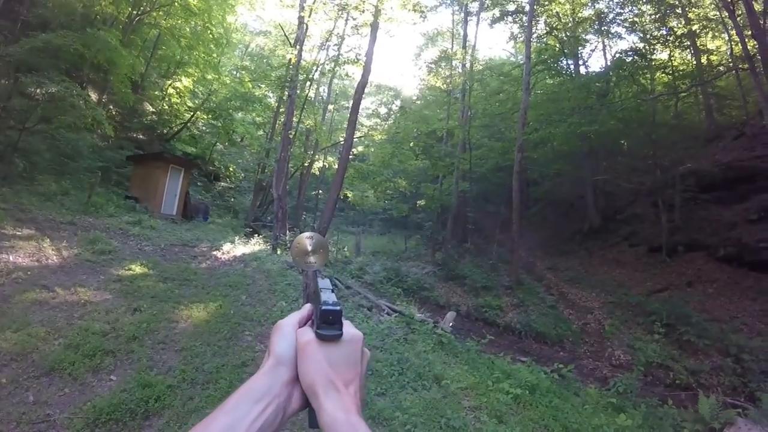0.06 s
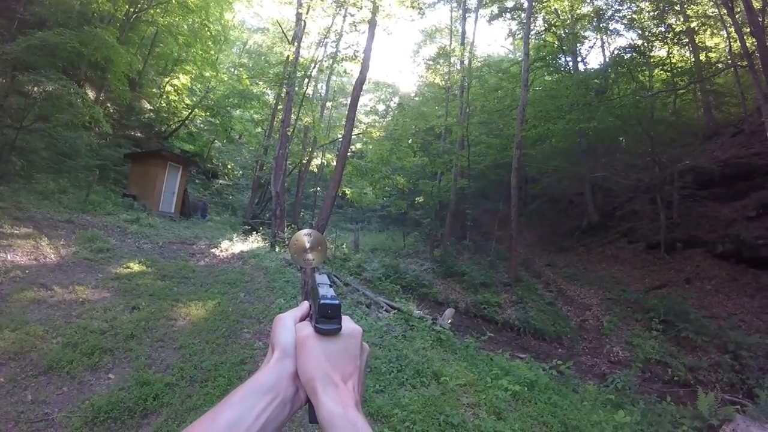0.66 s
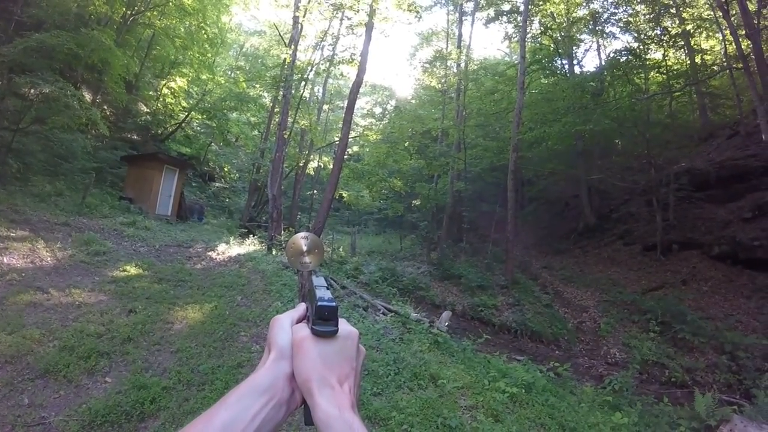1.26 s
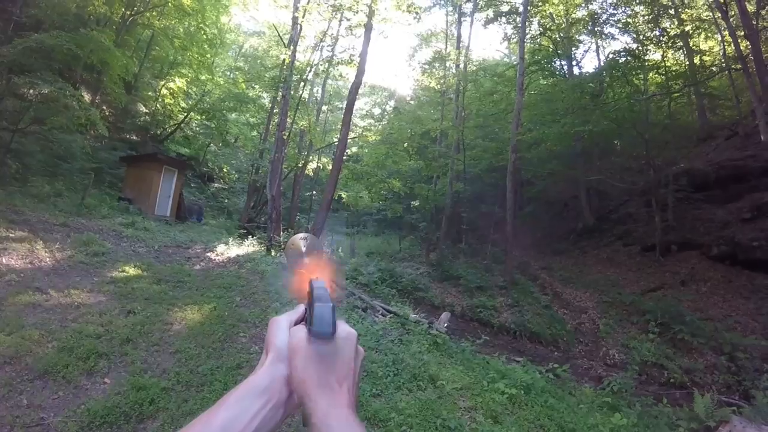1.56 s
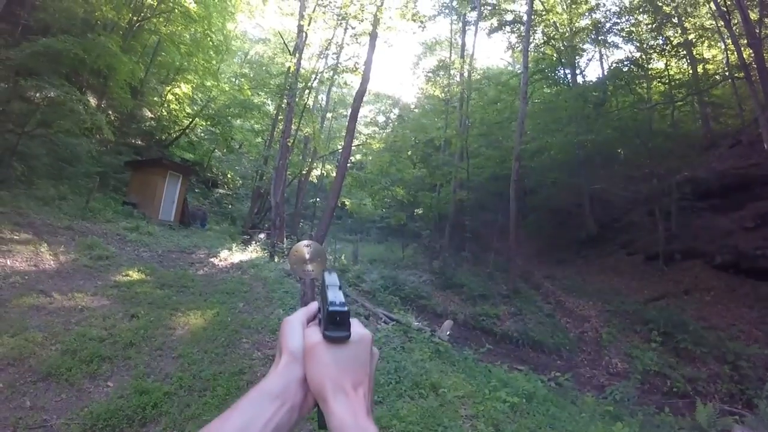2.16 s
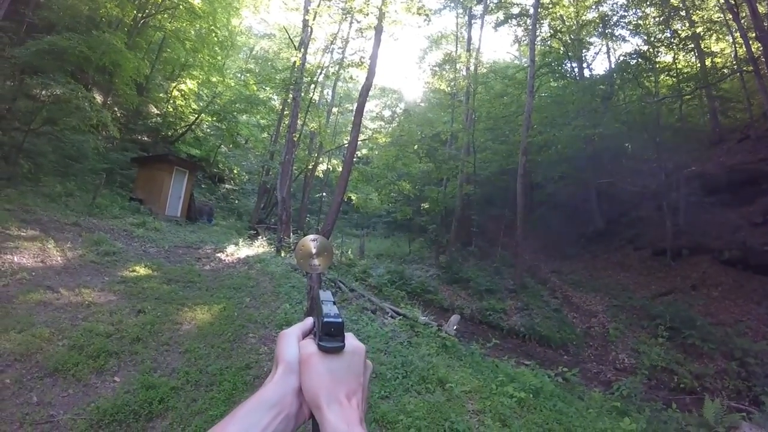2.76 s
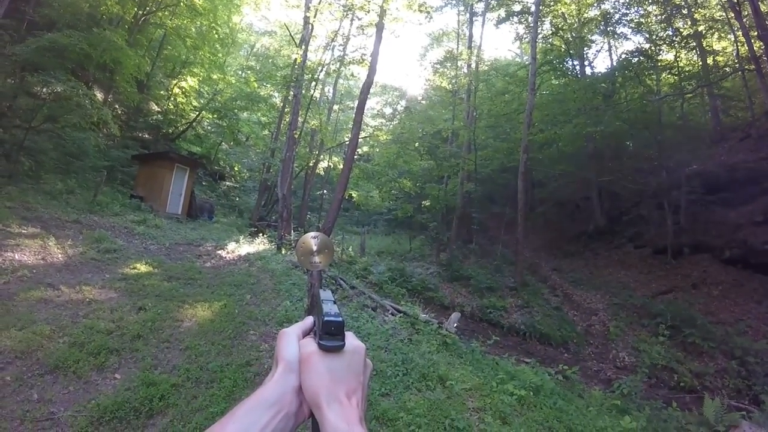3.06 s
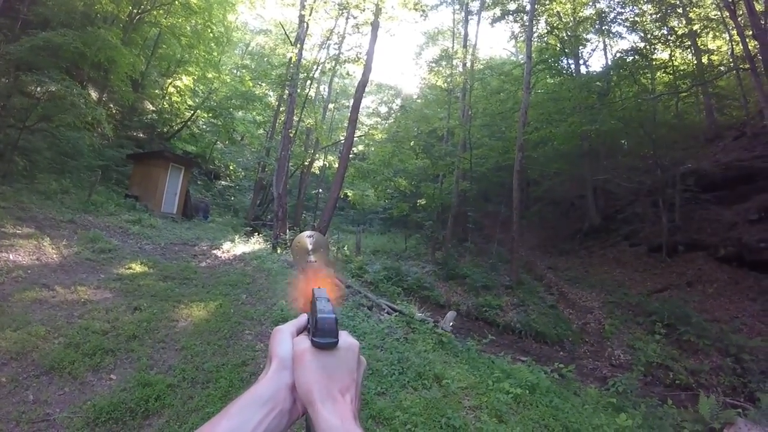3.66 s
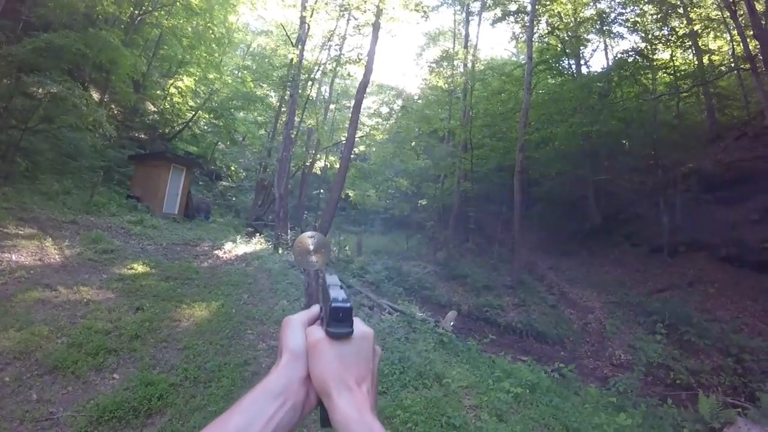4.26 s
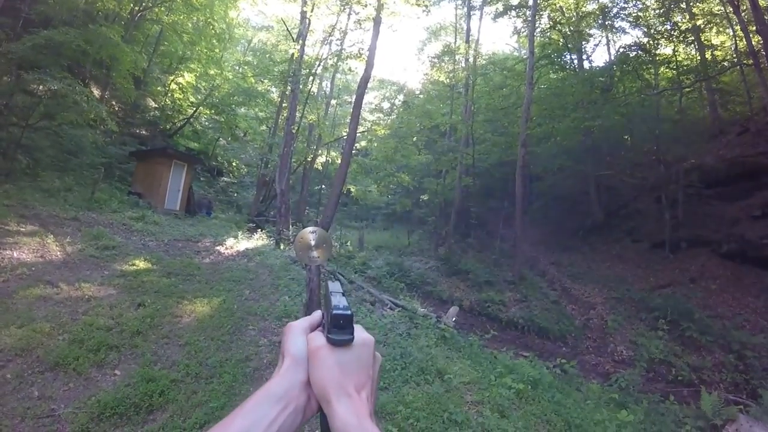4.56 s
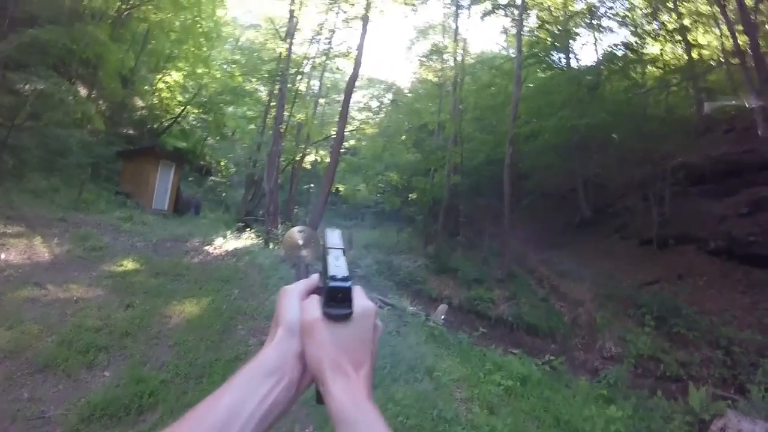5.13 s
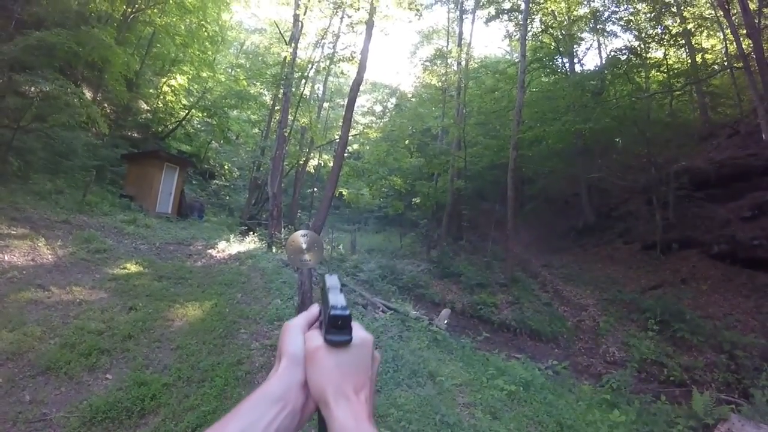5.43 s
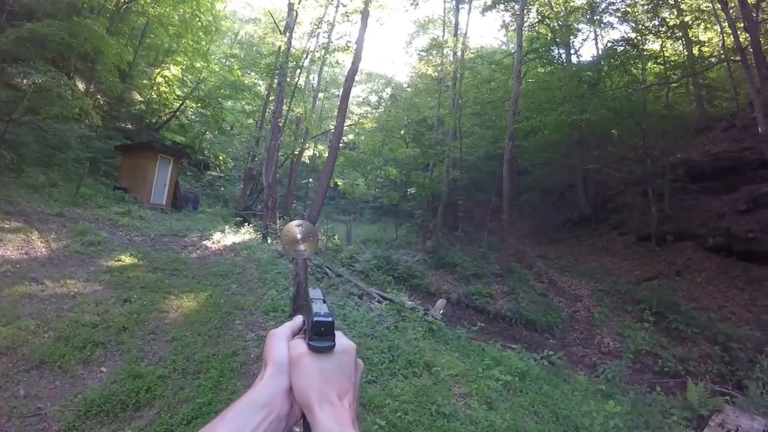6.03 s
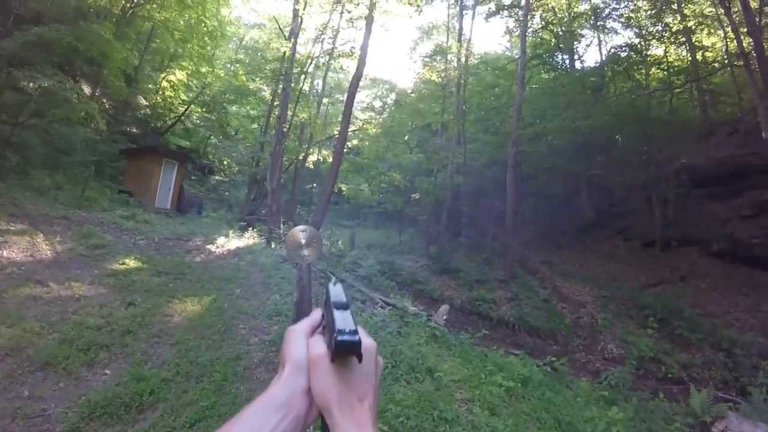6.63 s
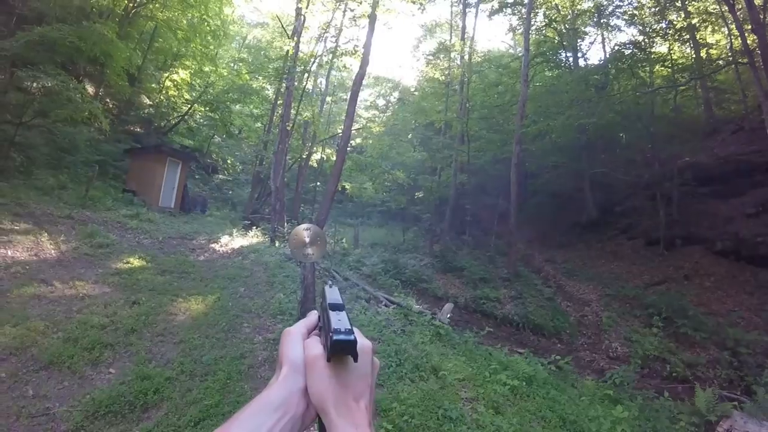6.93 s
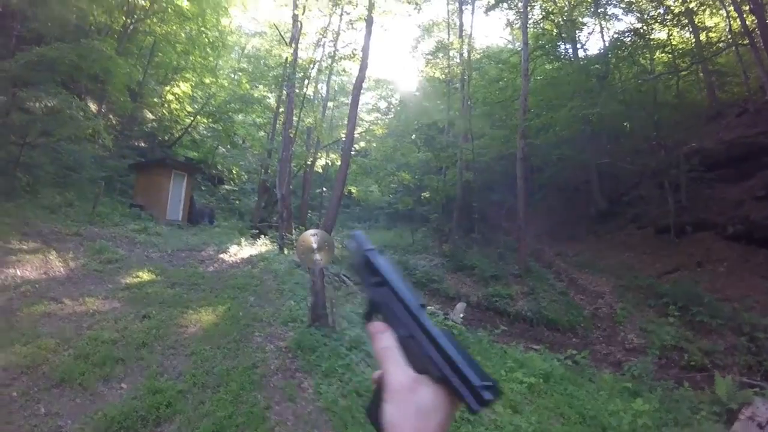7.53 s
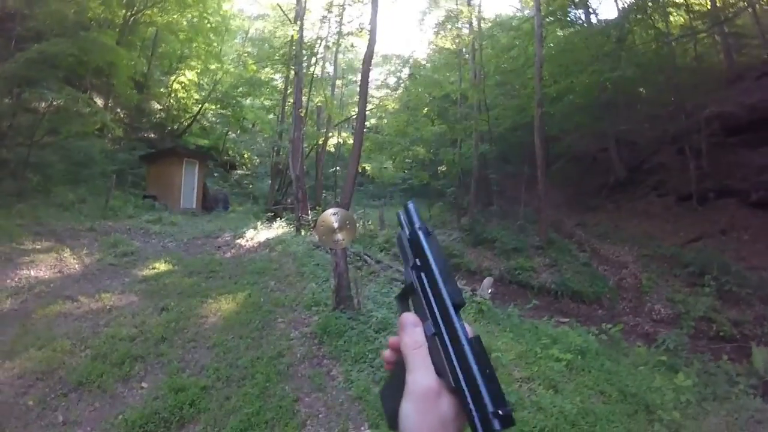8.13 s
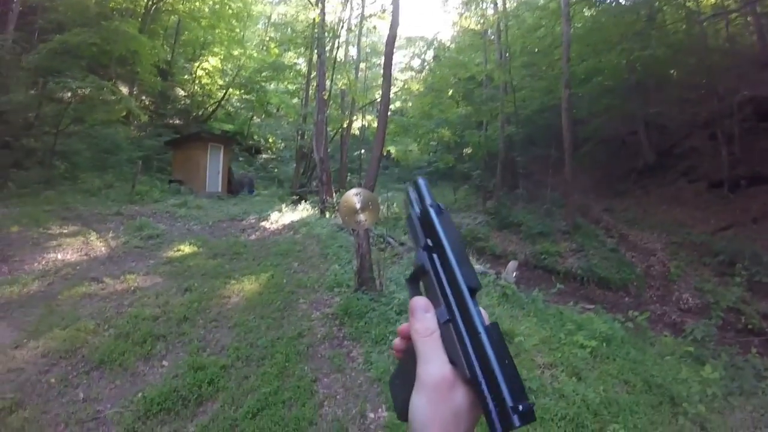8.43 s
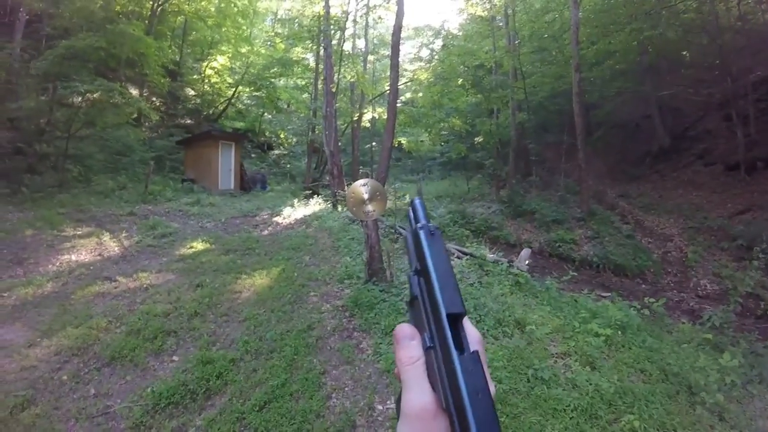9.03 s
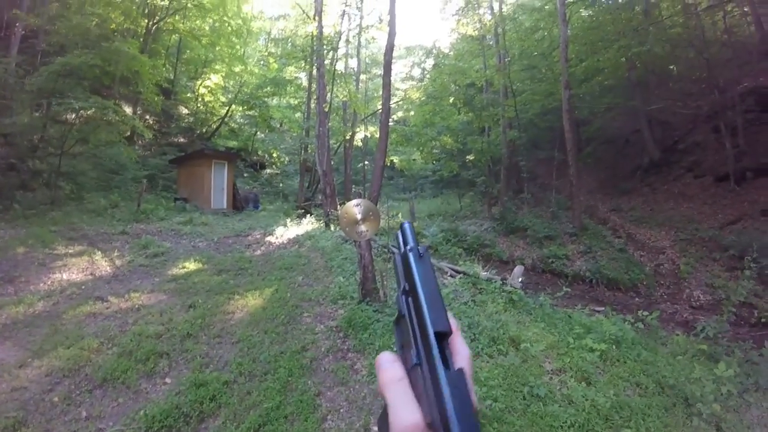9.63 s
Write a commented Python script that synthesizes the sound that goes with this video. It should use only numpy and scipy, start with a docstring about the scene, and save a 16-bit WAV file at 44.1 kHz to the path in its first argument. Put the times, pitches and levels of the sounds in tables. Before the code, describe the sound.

Four loud pistol shots echo through woods, each setting a cymbal faintly ringing, then the gun clicks and its slide locks open.

```python
"""A shot's echo and a cymbal's ring fade in a wooded hollow; four more pistol shots strike the cymbal.
Each pressure front rings the case of a small camera on the shooter's head and overloads its microphone.
The gain ducks and creeps back while the trees scatter the blast and the plate vibrates in its modes.
Then the pistol clicks in the hand and its steel slide locks open.
Moving air rumbles on the microphone throughout."""
import sys
import numpy as np
from scipy import signal
from scipy.fft import rfft, irfft
from scipy.io import wavfile

SR = 44100
rng = np.random.default_rng(int(sys.argv[2]) if len(sys.argv) > 2 else 0)


def wrap_up_sound(samples):
    """Save the sound to the file named by the first command line argument, as 16-bit audio."""
    columns = np.atleast_2d(samples).T
    # keep every value between -1 and 1, then stretch to whole-number steps
    tamed = np.clip(columns, -1, 1)
    steps = np.round(tamed * 32767).astype(np.int16)
    wavfile.write(sys.argv[1], SR, steps)


N = 436149
TIME = np.arange(N) / SR

# Levels in the tables are relative; t60_s is the time taken to fall by 60 dB.
# shots, the earliest fired just before the start: start_s, blast_db, echo_db, cymbal_db
SHOT_EVENTS = [(-.69, 0, 0, 1), (1.6499, .9, 1, -.5), (3.76305, 1.1, 1.2, .5), (5.02088, .7, .2, .5),
               (6.2043, 1.1, .8, .5)]
# modes of the case under the blast: pitch_hz, level_db, t60_s
CASE_MODES = [(810, 12.9, .006), (1340, 11.3, .0063), (410, 5.5, .009), (1905, -3.5, .044),
              (2480, 11.4, .009), (3580, 6.5, .011), (4020, 3.1, .008), (5570, -1.9, .008)]
# resonances that the case lends to the surrounding sounds: centre_hz, width_hz, gain_db
CASE_RESONANCES = [(1210, 280, 5.3), (2400, 350, 2), (3560, 270, 10), (4950, 250, 4), (6080, 450, 7.5)]
# strongest modes of the cymbal on its post: pitch_hz, level_db, t60_s
CYMBAL_MODES = [(744, -55, 2.4), (944, -55, 2.3), (1092, -57, 2), (1166, -56, 2), (1244, -51, 2.3),
                (1350, -55, 2.1), (1728, -58, 2.2), (2263, -53, 2), (2326, -52, 2.2), (2444, -50, 2.5),
                (2945, -52, 2.1), (3009, -51, 2.1), (3449, -58, 1.9), (3580, -59, 1.9)]
# single reflections from ground, bushes and a shed wall: delay_s, level_db, t60_s
REFLECTIONS = [(.0087, -7.5, .013), (.0167, -18.5, .025), (.0218, -19.5, .02), (.108, -29, .04)]
# spectrum of a reflection, and of the bullet's smack: frequency_hz, density_db
SMACK_SPECTRUM = [(200, -4), (500, -5), (1000, 2), (2000, -4), (3000, -10), (3500, -7), (4200, -13),
                  (5000, -21), (6200, -19), (8000, -23), (10000, -36), (14000, -30)]
# spectrum of the blast scattered by the woods: frequency_hz, density_db
ECHO_SPECTRUM = [(12, 20), (30, 8), (70, -6), (150, -23), (280, -9), (550, -5), (850, -1.8), (1200, 0),
                 (1500, -3), (2050, -2.3), (2900, 1.3), (3400, 2.5), (3850, -3.2), (4250, -2.3),
                 (4650, -11), (7300, -12), (9500, -28), (13000, -23), (15000, -34)]
# clicks of the pistol in the hand: start_s, level_db
GRIP_CLICKS = [(7.2345, -43), (7.2614, -43), (7.307, -42), (7.325, -40), (7.386, -47), (7.437, -47),
               (7.7697, -28.5), (7.787, -38), (8.514, -50), (9.612, -49)]
# spectrum of such a click: frequency_hz, density_db
GRIP_SPECTRUM = [(400, -17), (1000, -13), (1500, -15), (2000, -5), (2450, 3), (3100, -2), (3700, -9),
                 (5000, -16), (6200, -24), (7500, -22), (13000, -31)]
# metal catches of the slide: start_s, contact_db, contact_t60_s, tilt_db_per_octave, modes_db
SLIDE_CATCHES = [(8.0578, -22.5, .016, -3.5, -60), (8.3075, -33, .06, 0, -46),
                 (8.3172, -16.5, .014, -.5, -40), (8.3215, -26, .04, 0, -38.5)]
# spectrum of steel meeting steel: frequency_hz, density_db
CATCH_SPECTRUM = [(300, -27), (900, -16), (1500, -17), (2200, -5), (2800, -3), (3300, 5), (4000, -1),
                  (4800, -17), (6200, -14), (7500, -5), (10000, -19), (14000, -13)]
# modes of the slide: pitch_hz, level_db, t60_s
SLIDE_MODES = [(2120, -1, .1), (2380, -2, .13), (3400, -4, .3), (3560, -12, .55), (3900, -7, .1),
               (4530, -17, .13), (6270, -9, .16), (7250, -11, .16), (10760, -19, .2), (12290, -14, .2),
               (13230, -17, .17)]
# spectrum of the wind's rumble: frequency_hz, density_db
WIND_SPECTRUM = [(5, -7), (11, 0), (20, -7), (35, -12), (60, -23), (110, -36), (250, -50), (600, -72)]
# swells of low rumble, the last just before a shot: peak_s, half_length_s, gain_db
RUMBLE_SWELLS = [(1.1, .15, 6), (2.8, .25, 3), (4.85, .25, 6)]
# spectrum of still woodland air: frequency_hz, density_db
AIR_SPECTRUM = [(60, 0), (150, -2.5), (300, -7), (650, -11), (1200, -21), (2000, -22), (3500, -27.5),
                (5000, -31.5), (6200, -36), (8000, -34.5), (12500, -38.5), (15000, -46)]


def muzzle_blasts(lead_db=-16.6, main_lag_s=.00124):
    """Superposition of two pressure fronts: a weak one runs just ahead of the main blast."""
    out = np.zeros(N)
    for start_s, blast_db, _, _ in SHOT_EVENTS:
        add(out, start_s, from_db(blast_db + lead_db) * pressure_front())
        add(out, start_s + main_lag_s, from_db(blast_db) * pressure_front())
    return out


def pressure_front(push_db=7.9, push_s=.00125, leak_hz=4.6, detune=.02):
    """Impulse response: a front rings the case and pushes the diaphragm; the push leaks and overshoots."""
    t = TIME[:SR // 2]
    push = -from_db(push_db) * t / push_s * np.exp(1 - t / push_s)
    push = signal.sosfilt(signal.butter(2, leak_hz, "high", fs=SR, output="sos"), push)
    modes = [(hz * (1 + detune * rng.normal()), db, t60) for hz, db, t60 in CASE_MODES]
    return push + ring(modes, t)


def cymbal(spread_db=2.5, smack_db=-32, shimmer_db=-65, shimmer_t60_s=2.1, weak_count=70):
    """Free vibration of a plate: each bullet smacks it and excites strong modes over many weak ones."""
    out = np.zeros(N)
    travel_s = .067   # the bullet flies out and the clang comes back
    weak_modes = [(hz, shimmer_db, shimmer_t60_s) for hz in rng.uniform(700, 3700, weak_count)]
    partials = np.array([ring([mode], TIME[:2 * SR]) for mode in list(CYMBAL_MODES) + weak_modes])
    for start_s, _, _, db in SHOT_EVENTS:
        strengths = from_db(db + spread_db * rng.standard_normal(len(partials)))
        signs = rng.choice([-1, 1], len(partials))
        add(out, start_s + travel_s, (strengths * signs) @ partials)
        add(out, start_s + travel_s, from_db(db + smack_db) * burst(SMACK_SPECTRUM, t60_s=.02))
    return out


def woods():
    """Reflection: each shot returns from the ground and bushes nearby, then from the trees."""
    out = np.zeros(N)
    for start_s, blast_db, echo_db, _ in SHOT_EVENTS:
        add(out, start_s, from_db(echo_db) * forest_echo())
        for delay_s, db, t60_s in REFLECTIONS:
            add(out, start_s + delay_s, from_db(blast_db + db) * burst(SMACK_SPECTRUM, t60_s))
    return out


def forest_echo(loss_db_per_s_at_1khz=1.7, loss_power=1.3):
    """Scattering and air absorption: the longer an echo's path, the more treble it loses."""
    t = TIME[:2 ** 17]
    centres_hz = np.array([0, 1500, 3500, 5000, 7000, 10000, 15000])
    spectrum = rfft(noise(ECHO_SPECTRUM, len(t)))
    bin_hz = np.fft.rfftfreq(len(t), 1 / SR)
    scattered = 0
    for hz in centres_hz:
        band = irfft(spectrum * np.interp(bin_hz, centres_hz, centres_hz == hz))
        scattered += band * from_db(-loss_db_per_s_at_1khz * (hz / 1000) ** loss_power * t)
    slopes = swell(t, top_s=.155, top_db=-24.6, growth=1.1)
    undergrowth = from_db(-32) * decay(t, t60_s=.25)
    ground_roll = band_noise(240, 520, len(t)) * from_db(-40) * decay(t, t60_s=.9)
    # the far end of the hollow answers late and dull
    far_end = band_noise(450, 1050, len(t)) * swell(t, top_s=.58, top_db=-56, growth=1.5)
    return scattered * np.hypot(slopes, undergrowth) + ground_roll + far_end


def swell(t, top_s, top_db, growth, spread_power=1.6, loss_db_per_s=7.5):
    """An echo grows as the blast reaches more trees, then falls by spreading and absorption."""
    path = np.maximum(t / top_s, 1e-9)
    spreading = np.maximum(path, 1) ** -spread_power
    absorption = from_db(-loss_db_per_s * np.maximum(t - top_s, 0))
    return from_db(top_db) * np.minimum(path, 1) ** growth * spreading * absorption


def grip(click_db=-7.5, cutoff_hz=5200):
    """Damped impacts: the pistol gives brief, dull clicks in the hand."""
    out = np.zeros(N)
    for start_s, db in GRIP_CLICKS:
        add(out, start_s, from_db(db + click_db) * burst(GRIP_SPECTRUM, t60_s=.05))
    return signal.sosfilt(signal.butter(1, cutoff_hz, fs=SR, output="sos"), out)


def slide(catch_db=-13, clack_db=.5, ring_db=-15.5, damping=7, detune=.018, cluster_size=3):
    """Contact damping: steel parts clack while they touch, then ring on in clusters of close modes."""
    out = np.zeros(N)
    for start_s, contact_db, contact_t60_s, tilt, modes_db in SLIDE_CATCHES:
        # each catch has its own brightness; the first is dullest
        spectrum = [(hz, db + tilt * np.log2(hz)) for hz, db in CATCH_SPECTRUM]
        add(out, start_s, from_db(contact_db + catch_db) * burst(spectrum, contact_t60_s))
        damped = [(hz, db, t60 / damping) for hz, db, t60 in SLIDE_MODES]
        add(out, start_s, from_db(modes_db + clack_db) * ring(damped, TIME[:SR // 4]))
        clusters = list(SLIDE_MODES) * cluster_size
        free = [(hz * (1 + detune * rng.normal()), db, t60) for hz, db, t60 in clusters]
        add(out, start_s, from_db(modes_db + ring_db) * ring(free, TIME[:SR // 2]))
    return out


def nearby_trees(x, echo_db=-17, t60_s=1.1):
    """Reverberation: a small sound returns faintly from the nearest trunks."""
    echo = rng.standard_normal(SR) * decay(TIME[:SR], t60_s)
    return x + from_db(echo_db) * signal.fftconvolve(x, echo / np.linalg.norm(echo))[:N]


def wind(breeze_db=-42, move_s=7.15, rise_s=.25, move_db=9.3, settle_db_per_s=1.7):
    """Airflow rumbles on the microphone, rising as the shooter moves and easing as he settles."""
    onset = np.clip((TIME - move_s) / rise_s, 0, 1)
    moving_db = onset * (move_db - settle_db_per_s * (TIME - move_s))
    swell_db = sum(db * np.exp(-((TIME - peak_s) / half_s) ** 2) for peak_s, half_s, db in RUMBLE_SWELLS)
    return from_db(breeze_db + moving_db + swell_db) * noise(WIND_SPECTRUM)


def through_case(x):
    """Resonance: the case lifts a few narrow bands of the sound passing through it."""
    for hz, width_hz, db in CASE_RESONANCES:
        band = signal.lfilter(*signal.iirpeak(hz, hz / width_hz, fs=SR), x)
        x = x + (from_db(db) - 1) * band
    return x


def gain_control(x, threshold_db=4.6, release_db_per_s=13.5, attack_s=.003):
    """Compression: the gain drops within milliseconds of a blast and climbs back steadily."""
    over_db = np.maximum(20 * np.log10(np.abs(x) + 1e-9) - threshold_db, 0)
    recovery_db = release_db_per_s * TIME
    held_db = np.maximum.accumulate(over_db + recovery_db, axis=-1) - recovery_db
    pole = np.exp(-1 / (attack_s * SR))
    return x * from_db(-signal.lfilter([1 - pole], [1, -pole], held_db))


def from_db(db):
    """Amplitude ratio of a level in decibels."""
    return 10 ** (np.asarray(db) / 20)


def decay(t, t60_s):
    """Exponential decay, by 60 dB in t60_s."""
    return np.exp(-np.log(1000) * t / t60_s)


def ring(modes, t):
    """Modal sum: damped sinusoids of alternating sign."""
    return sum((-1) ** k * from_db(db) * decay(t, t60_s) * np.sin(2 * np.pi * hz * t)
               for k, (hz, db, t60_s) in enumerate(modes))


def noise(spectrum, size=N):
    """Noise of rms 1, shaped to the given spectrum."""
    padded = 1 << (size - 1).bit_length()
    hz, db = np.transpose(spectrum)
    bin_hz = np.fft.rfftfreq(padded, 1 / SR)
    gain = from_db(np.interp(np.log(bin_hz + 1e-9), np.log(hz), db))
    x = irfft(rfft(rng.standard_normal(padded)) * gain)[:size]
    return x / x.std()


def band_noise(low_hz, high_hz, size):
    """Band-limited noise of rms 1."""
    bandpass = signal.butter(2, [low_hz, high_hz], "band", fs=SR, output="sos")
    x = signal.sosfilt(bandpass, rng.standard_normal(size))
    return x / x.std()


def burst(spectrum, t60_s):
    """A transient: short noise under exponential decay."""
    t = TIME[:SR // 6]
    return noise(spectrum, len(t)) * decay(t, t60_s)


def add(out, start_s, sound):
    """Superpose a sound from start_s; any part before time zero is dropped."""
    at = int(round(start_s * SR))
    part = sound[max(-at, 0):max(N - at, 0)]
    out[max(at, 0):max(at, 0) + len(part)] += part


def scene(air_db=-55):
    """Superposition in one channel: blasts, echoes, cymbal and handling over wind and quiet air."""
    outside = woods() + cymbal() + nearby_trees(grip() + slide())
    outside += from_db(air_db) * noise(AIR_SPECTRUM)
    return (muzzle_blasts() + through_case(outside) + wind())[None]


def record(dry, ceiling=.94, rolloff_hz=11500, cutoff_hz=15000):
    """Saturation follows the gain control; the treble then rolls off gently and ends in a steep cut."""
    x = gain_control(dry)
    saturated = x / (1 + (x / ceiling) ** 4) ** (1 / 4)
    softened = signal.sosfilt(signal.butter(2, rolloff_hz, fs=SR, output="sos"), saturated)
    return signal.sosfiltfilt(signal.butter(16, cutoff_hz, fs=SR, output="sos"), softened)


dry = scene()
out = record(dry)
wrap_up_sound(out)
```